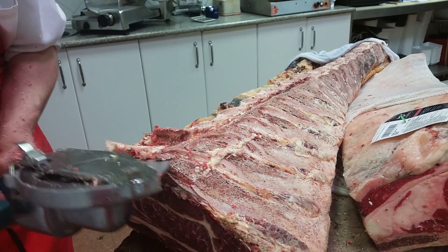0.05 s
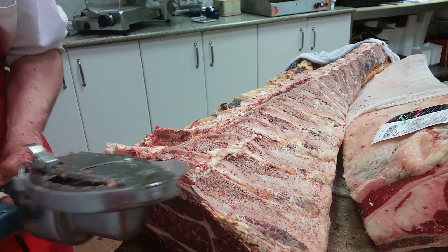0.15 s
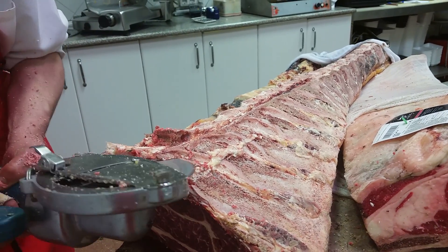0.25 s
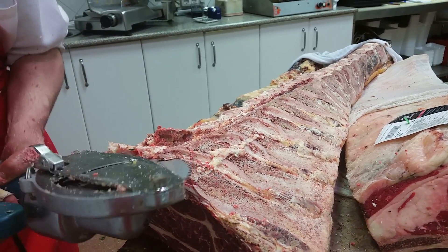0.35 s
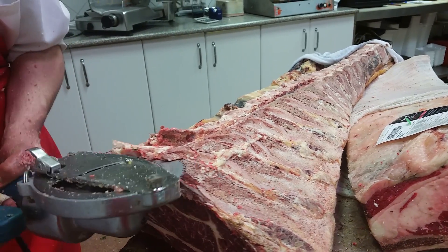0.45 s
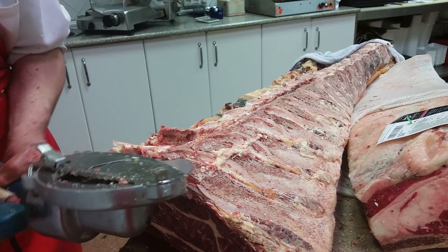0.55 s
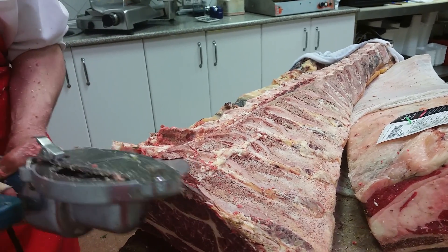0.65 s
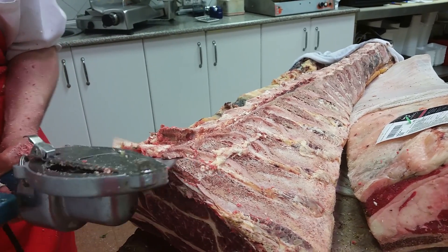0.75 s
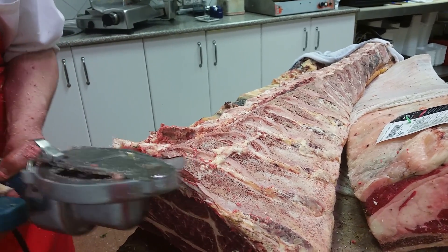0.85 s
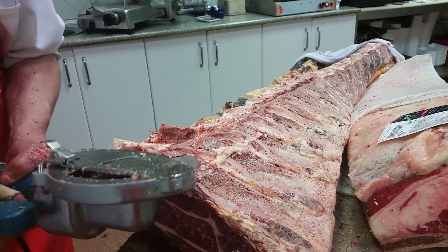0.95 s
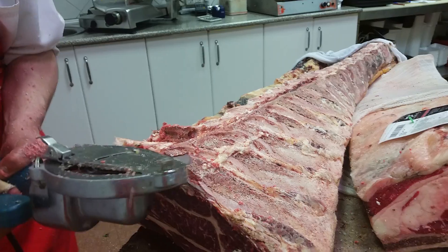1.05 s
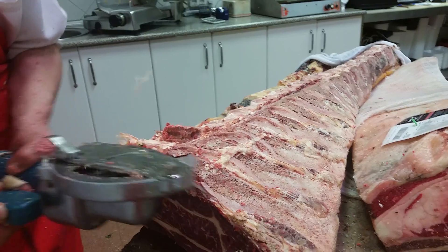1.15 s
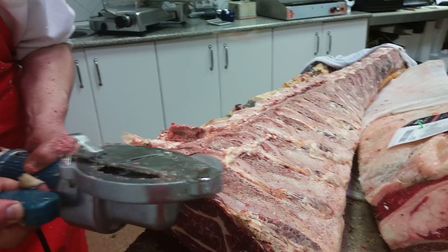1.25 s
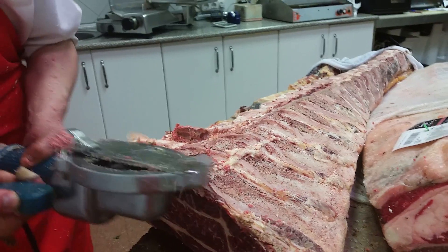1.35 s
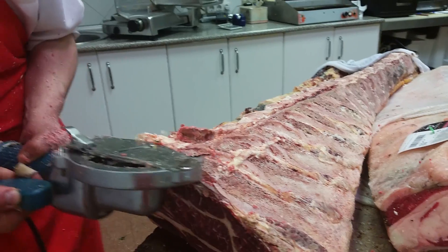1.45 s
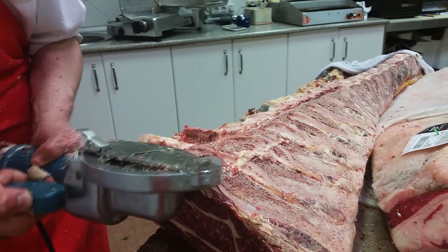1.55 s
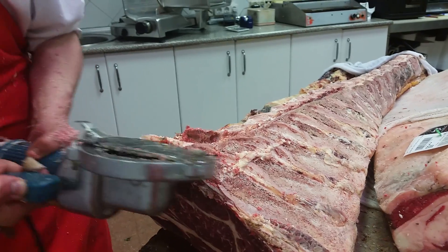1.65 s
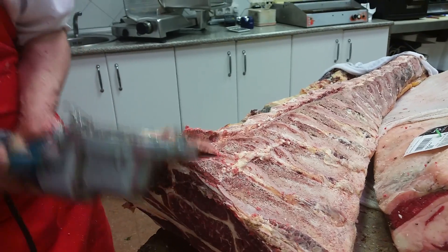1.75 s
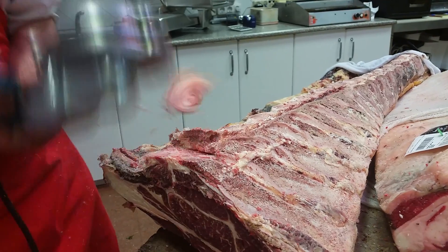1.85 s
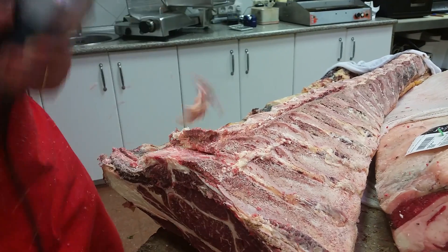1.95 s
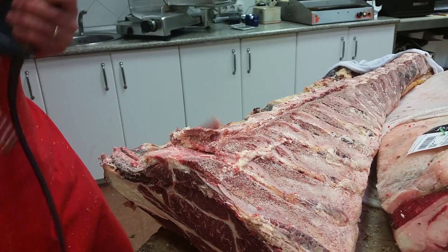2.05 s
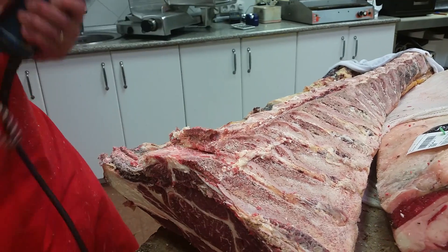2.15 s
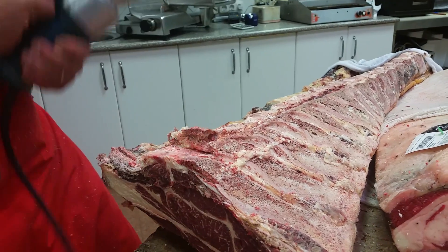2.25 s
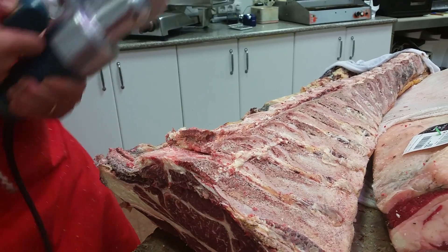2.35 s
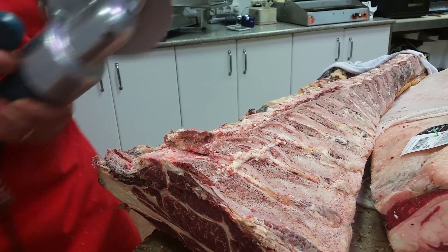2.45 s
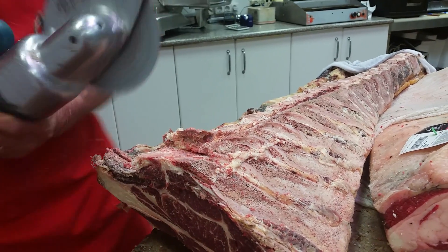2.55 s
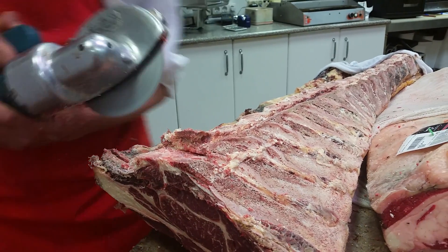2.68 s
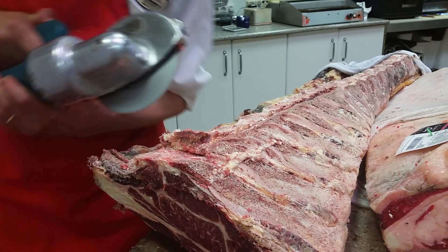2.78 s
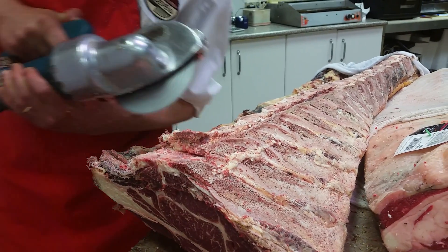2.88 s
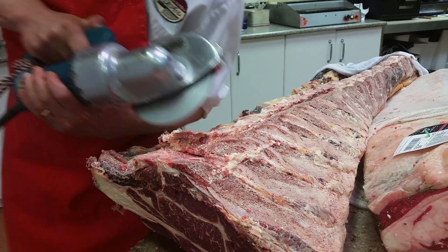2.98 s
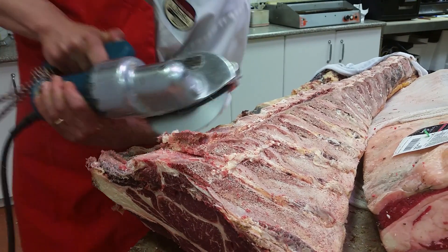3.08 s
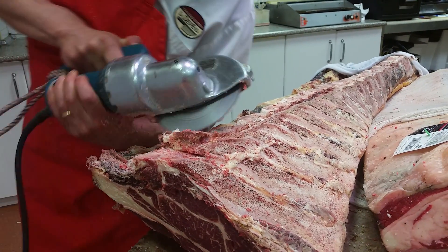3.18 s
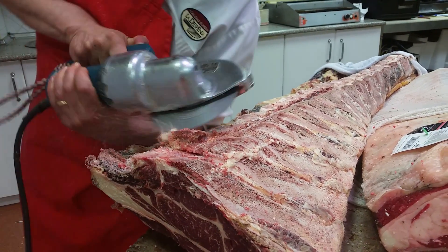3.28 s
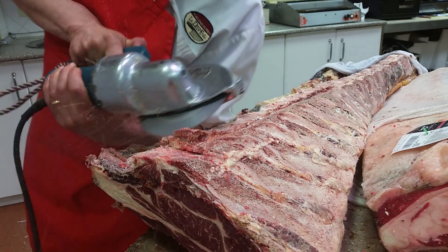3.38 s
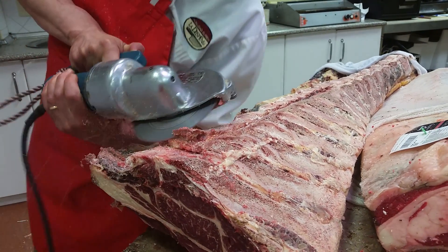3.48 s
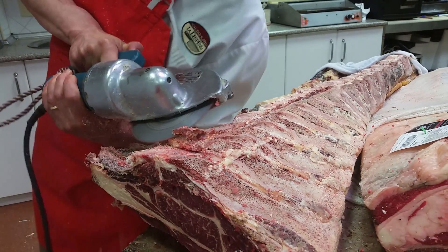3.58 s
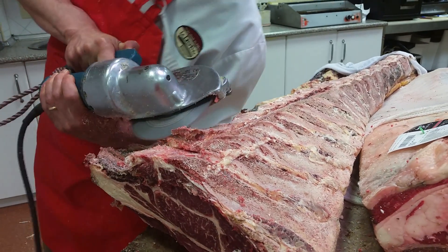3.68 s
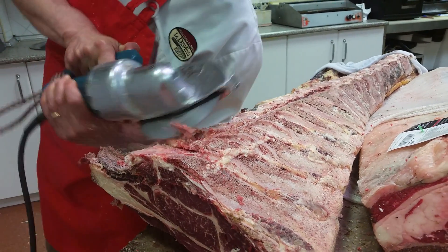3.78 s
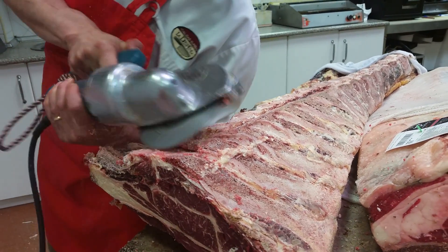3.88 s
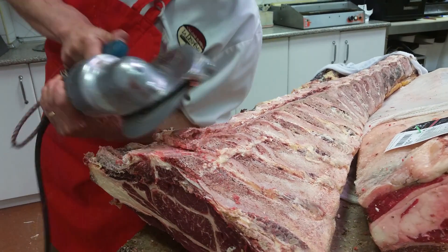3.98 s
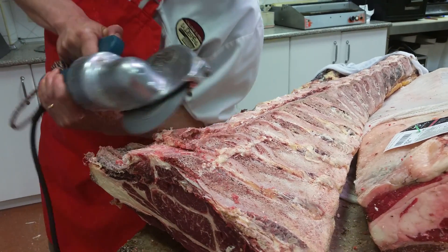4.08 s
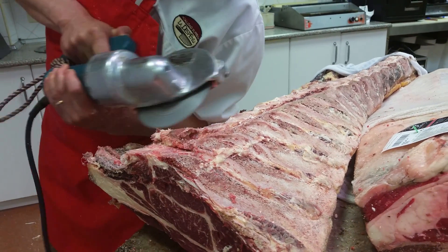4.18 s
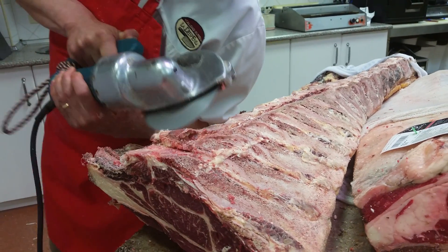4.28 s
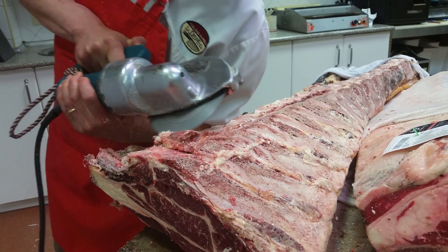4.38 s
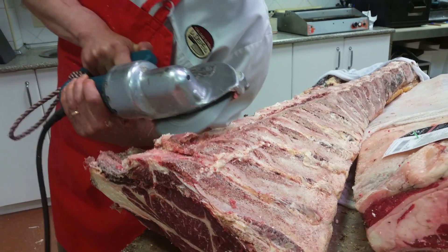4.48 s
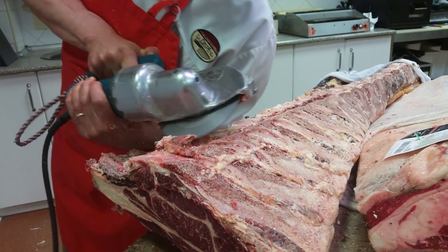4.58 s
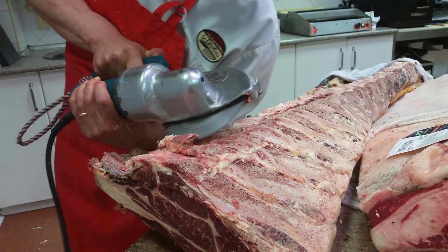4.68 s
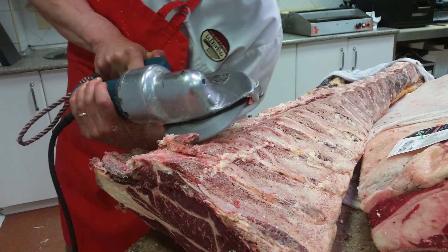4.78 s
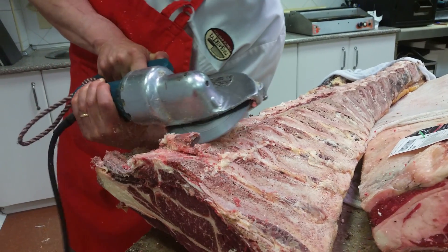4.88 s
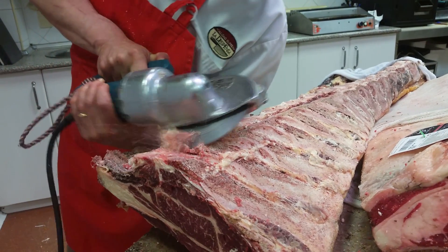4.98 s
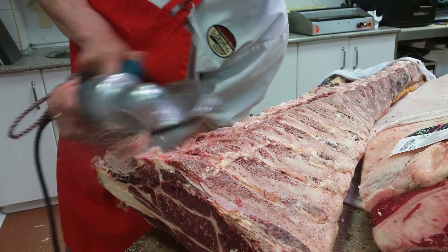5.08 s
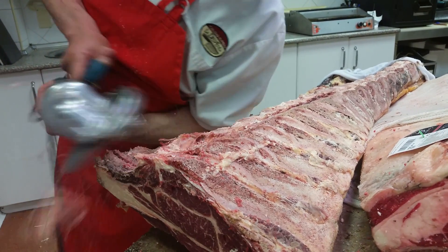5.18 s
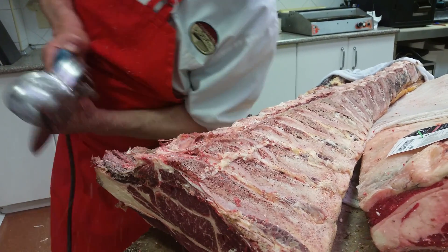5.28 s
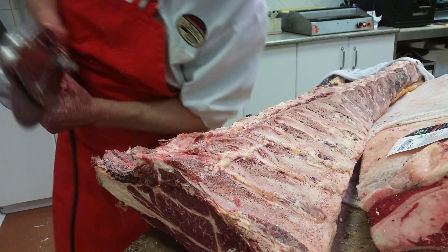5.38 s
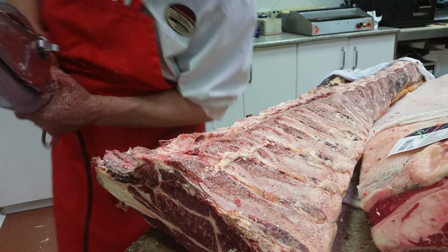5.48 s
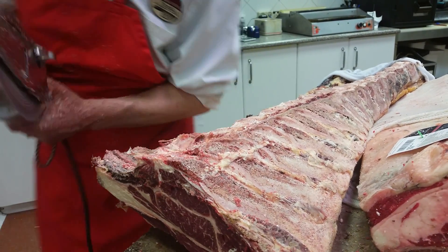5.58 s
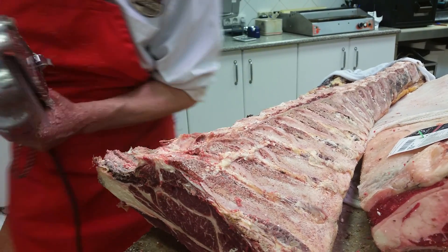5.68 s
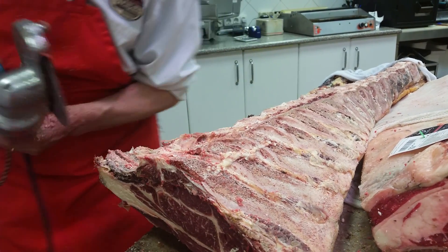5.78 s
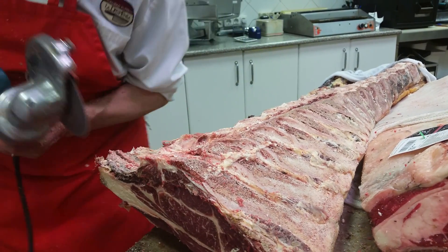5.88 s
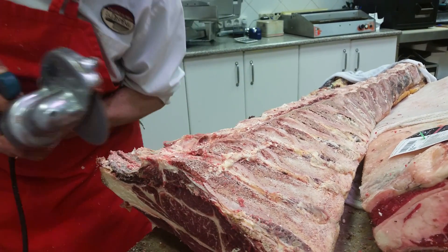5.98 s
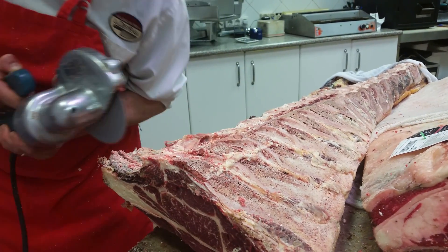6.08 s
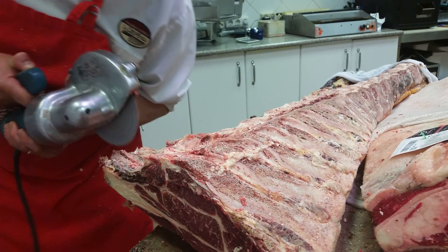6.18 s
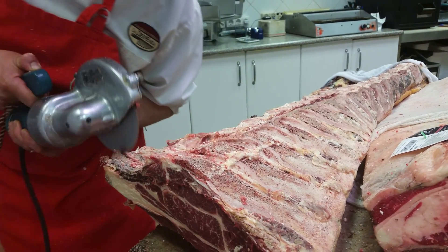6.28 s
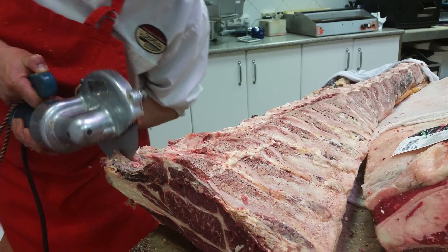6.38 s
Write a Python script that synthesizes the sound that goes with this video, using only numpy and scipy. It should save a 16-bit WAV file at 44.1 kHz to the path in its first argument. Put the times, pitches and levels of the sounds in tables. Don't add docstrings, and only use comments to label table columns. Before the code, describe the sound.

A handheld electric saw grinds harshly through bone, coasts down, whines back up, bites again with a ringing screech, then slows and revs once more.

```python
import sys
import numpy as np
from scipy import signal
from scipy.fft import rfft, irfft, next_fast_len
from scipy.io import wavfile
from scipy.ndimage import uniform_filter1d, map_coordinates

SR = 44100
rng = np.random.default_rng(int(sys.argv[2]) if len(sys.argv) > 2 else 0)


def wrap_up_sound(samples):
    columns = np.atleast_2d(samples).T
    tamed = np.clip(columns, -1, 1)
    steps = np.round(tamed * 32767).astype(np.int16)
    wavfile.write(sys.argv[1], SR, steps)


def how_loud(loudness_db):
    steps = np.asarray(loudness_db, float) / 20
    return 10 ** steps


N = 283563
FFT_LEN = next_fast_len(N, True)
HZ = np.fft.rfftfreq(FFT_LEN, 1 / SR)
T_S = np.arange(N) / SR

# freq_hz, level_db_per_hz
SHOP_TONE = [(15, -29), (25, -5), (64, -1.5), (267, -0.5), (340, -1), (389, -1), (666, -17), (871, -15),
             (2420, -2), (3930, -34), (6210, -21), (15500, -50)]
# freq_hz, level_db
HUMS = [(100.0, -59), (331.0, -64.5), (662.0, -59.5), (1325.0, -60)]
# freq_hz, level_db_per_hz
GEAR_TONE = [(180, -38), (300, -29), (429, -19), (476, -18.5), (650, -14.5), (1020, -15.5), (1160, -9),
             (1710, -6.5), (2480, 3.5), (3440, -13), (4700, -1.5), (6240, 2), (7570, -4.5), (8780, 2),
             (10500, -27), (13600, -48), (22000, -120)]
# freq_hz, level_db_per_hz
AIR_TONE = [(5290, -63), (9000, -1), (9810, -3.5), (13900, -9), (15900, -17.5)]
# freq_hz, left_minus_right_db
MOTOR_SIDES = [(60, -1.0), (110, -1.0), (200, -3), (380, 1), (700, 3), (1290, 0), (2380, -2), (4400, -13.5),
               (8120, -6.5), (15000, -1)]
# from_s, start_hz, goal_hz, time_constant_s
SPEED = [
    (0, 6175, 6175, 1),
    (1.96, 6175, 800, .95),
    (2.49, 3906, 7576, .323),
    (3.17, 7125, 6900, .2),
    (4.0, 7006, 7878, .523),
    (4.41, 7480, 6900, .2),
    (5.2, 6278, 1900, .952),
    (5.57, 4885, 7617, .356),
    (6.34, 7300, 7000, .2),
]
# whine_db, octave_db, air_db, armature_orders_db, gear_orders_db
STATES = [
    (-55, -64, -12, -3, -5),
    (-49, -56, -11, 2.2, -2),
    (-26, -39, -8.5, 3.5, -5),
    (-29.5, -49, -1.5, -6, -12),
    (-30.5, -36, -9.5, 4, 0),
    (-38, -47, -3, -6, -8),
    (-31, -41, -8, -4, -4),
    (-27.5, -41, -8, 2.5, 4.5),
    (-24, -42, -8, 1.5, -7),
]
SPEED_SLOPES = [14, 8, 12, 6, 22]
# time_s, gear_noise_db, left_minus_right_db
HELD = [(1.96, -27, -5), (2.05, -26, -4.5), (2.15, -26.5, -2.5), (2.47, -26, -0.5), (2.5, -23.5, -2),
        (2.609, -23, -4.5), (3.12, -21, -3.5), (3.17, -24, -3.5), (3.975, -27.5, -8), (4.04, -21, -1.5),
        (4.39, -21.5, -2), (4.42, -27.5, -2), (5.22, -22, -2.2), (5.3, -23, -2.5), (5.38, -22, 0.2),
        (5.58, -22.5, -4.5), (6.02, -22.5, -3.5), (6.32, -21.5, 0)]
# shaft_order, level_db
ARMATURE_ORDERS = [(2, -30), (3, -32.5), (4, -28.5)]
# shaft_order, level_db
GEAR_ORDERS = [(5, -44), (6, -25.5), (7, -25), (8, -23)]
# time_s, level_db, pitch_hz, t60_s
GUARD_KNOCKS = [
    (0.637, -27.5, 627, 0.17),
    (0.709, -20, 645, 0.069),
]
# time_s, level_db, pitch_hz, t60_s
FREED_BLADE = [
    (1.97, -45.5, 828, 2.7),
]
# start_s, length_s, level_db, left_minus_right_db
POPS = [(0, 0.17, -29.5, -1.5), (0.184, 0.054, -30, -5), (0.722, .12, -30.5, 2.5), (0.864, 0.14, -29.5, -6),
        (1.008, 0.022, -28, 9), (1.082, 0.09, -27.5, -4), (1.16, 0.054, -25, -3), (1.282, .16, -40.5, -7),
        (1.454, 0.039, -26.5, -7.5), (1.504, 0.18, -31, -0.5), (1.628, .02, -25.5, -1),
        (1.713, .045, -33.5, -8), (1.746, 0.01, -29, -10), (1.881, 0.016, -32.5, -8),
        (3.179, .006, -37, -9), (3.239, 0.0073, -30, -3), (3.29, 0.13, -45, -4), (3.443, 0.014, -29, -10),
        (3.475, 0.057, -31, -2), (3.852, 0.014, -27, -1), (4.424, 0.071, -30, 1.5), (4.52, 0.066, -24.5, 0),
        (4.748, 0.071, -30, -2), (4.837, 0.055, -29.5, -5), (4.927, 0.11, -35, 1), (5.025, .02, -28, -4),
        (5.055, 0.041, -25.5, -2), (5.18, .006, -50, -6), (6.356, .01, -51, -6)]
# from_s, high_teeth_bite_s, turns_per_s, slowing_per_s2
SPIN = [
    (0, .83, 24.6, 0),
    (2.5, 3.68, 37.2, 0),
    (4.3, 4.435, 37.5, 14),
    (5.15, 5.186, 37.2, 0),
]
# start_s, length_s, hiss_start_db, hiss_end_db, body_re_hiss_db
FIRST_BITES = [(0, 0.1, -21, -18, 4), (.106, 0.29, -18, -27.5, 3.5), (.354, 0.17, -31, -59.5, 7.5),
               (.462, 0.14, -56, -72, 17.5), (.636, 0.068, -33.5, -26, 13.5),
               (.71, 0.37, -20.5, -20.5, 5.5), (1.104, .1, -17, -19, 3), (1.208, 0.08, -19, -21, 3),
               (1.29, 0.14, -19.5, -20, 4.5), (1.45, 0.16, -17.5, -20, 3.5),
               (1.626, 0.068, -19.5, -20.5, 5), (1.69, 0.081, -19, -27, 4.5), (1.76, 0.14, -24, -30, 8.5),
               (1.862, 0.045, -18, -19.5, 3)]
# start_s, length_s, hiss_start_db, hiss_end_db, body_re_hiss_db
LATER_BITES = [(3.186, 0.02, -15, -36.5, 4), (3.242, 0.04, -17.5, -28, 1), (3.302, .148, -20, -19.5, 0.8),
               (3.452, 0.026, -11.5, -10, -5), (3.48, 0.044, -15.5, -9.5, -4),
               (3.55, 0.066, -14, -13.5, -8.5), (3.638, 0.2, -22, -23, -2), (3.848, .052, -16, -18.5, 0.5),
               (3.9, 0.063, -13.5, -39, -1.5), (3.981, 0.0081, -15, -23, 0.5),
               (5.18, 0.02, -18.5, -24, 4.5), (6.358, .03, -19.5, -29, 2)]
# start_s, length_s, hiss_start_db, hiss_end_db, body_re_hiss_db
DEEP_BITES = [
    (4.416, 0.25, -16.5, -18.5, 0.7),
    (4.686, 0.007, -17.5, -20, 0.3),
    (4.71, 0.4, -18, -15.5, 0.73),
]
# freq_hz, level_db_per_hz
FIRST_TONE = [(180, -42), (300, -20.5), (1270, -6.5), (2350, 0.5), (2640, -1), (4070, -12), (6170, -31),
              (8050, 4.5), (10200, -6), (11400, -3), (15900, -5.5)]
# freq_hz, level_db_per_hz
LATER_TONE = [(180, -74), (300, -10.5), (1450, -5), (2280, -4.5), (4000, -7), (6070, -32), (9340, 4.5),
              (10300, -31), (11000, 4), (13200, 5), (15900, 6.5)]
# freq_hz, width_hz, level_db
FIRST_MODES = [(2343, 23, 7), (3770, 41, -10), (4815, 110, -1), (6140, 190, 4.5), (7260, 530, 2),
               (8700, 120, -28), (8700, 10, -24.5), (9560, 73, -7.5), (11350, 120, 1), (13300, 360, -8),
               (14960, 170, -3)]
# freq_hz, width_hz, level_db
LATER_MODES = [(2357, 89, -1), (2910, 110, -5), (3580, 60, -10), (4585, 19, 1), (4720, 57, -5),
               (5896, 3.9, 13.5), (6280, 35, 8.5), (6840, 53, 1.5), (7350, 25, 3.5), (7800, 200, 1.5),
               (9100, 40, -10), (9650, 150, -3.5), (9300, 140, -7.5), (10970, 44, 10), (12400, 220, 0),
               (12990, 80, 7.5), (13200, 110, -20), (14900, 100, -5)]
# freq_hz, left_minus_right_db
FIRST_SIDES = [(60, -12), (110, -16), (200, -3), (380, -3.0), (700, -4), (1290, -4.5), (2380, -5),
               (4400, -15.5), (8120, -2), (15000, -2.5)]
# freq_hz, left_minus_right_db
LATER_SIDES = [(60, -1), (110, -12), (200, -1.5), (380, -1), (700, -1), (1290, -4), (2380, -7),
               (4400, -12.5), (8120, 0.5), (15000, -5.5)]

FIRST_EDGES_DB_PER_S, LATER_EDGES_DB_PER_S = (1080, 235), (1400, 520)
SPLIT_HZ = 9550
LEAD_SAMPLES = 5.89


def evened(x):
    return x / np.sqrt(np.mean(x ** 2) + 1e-20)


def read(points):
    hz, value = np.transpose(points)
    return np.interp(np.log(HZ + 1), np.log(hz + 1), value)


def row_at(table):
    index = np.searchsorted([row[0] for row in table], T_S, "right") - 1
    return np.array(table)[index].T, index


def drift(rate_hz, shape=()):
    step = 1 if rate_hz > 70 else 32
    count = next_fast_len(N // step + 2, True)
    hz = np.fft.rfftfreq(count, step / SR)
    smooth = rfft(rng.standard_normal(shape + (count,))) / np.sqrt(1 + (hz / rate_hz) ** 4)
    fine = np.repeat(irfft(smooth, count), step, axis=-1)
    return evened(uniform_filter1d(fine, size=step)[..., :N])


def panned(pan_db):
    return how_loud(np.outer([.5, -.5], pan_db))


def coloured(drive, gain, sides, alike, lead_samples=0):
    left, other = rfft(drive, FFT_LEN)
    late = left * np.exp(-2j * np.pi * HZ * lead_samples / SR)
    right = alike * late + np.sqrt(1 - alike ** 2) * other
    return np.array([left, right]) * gain * panned(read(sides))


def band(pair, upper):
    high = 1 / (1 + (SPLIT_HZ / (HZ + 1)) ** 24)
    x = irfft(pair * np.sqrt(high if upper else 1 - high), FFT_LEN)[:, :N]
    return x / x.mean(0).std()


def patchy(x, depth_db, bins, frames):
    z = signal.stft(x, nperseg=512, noverlap=384)[2]
    field = rng.standard_normal(z.shape[1:])
    for _ in range(2):
        field = uniform_filter1d(field, bins, 0)
        field = uniform_filter1d(field, frames, 1)
    z = z * how_loud(depth_db * evened(field))
    return signal.istft(z, nperseg=512, noverlap=384)[1][:, :N]


def bursts(start_s, length_s, from_db, to_db, rise_db_per_s, fall_db_per_s):
    depth_db, step = 90, 16
    rise_s, fall_s = depth_db / rise_db_per_s, depth_db / fall_db_per_s
    rows = []
    for a, b, p, q in zip(start_s, start_s + abs(length_s), from_db, to_db):
        times = [a - rise_s, a, b, b + fall_s]
        rows.append(np.interp(T_S[::step], times, [p - depth_db, p, q, q - depth_db]))
    db = np.array(rows)
    level_db = uniform_filter1d(np.repeat(db.max(0), step)[:N], size=100)
    return level_db, np.repeat(db.argmax(0), step)[:N]


def runout():
    (_, bite_s, turns_per_s, slowing), _ = row_at(SPIN)
    since_s = T_S - bite_s
    turns = (turns_per_s - .5 * slowing * since_s) * since_s
    return np.cos(2 * np.pi * turns + .3 * drift(3))


def shop():
    drive = rng.standard_normal((2, N))
    pair = coloured(drive, how_loud(read(SHOP_TONE)), [(50, 0.0), (2000, 0.0)], alike=0.77)
    rumble = irfft(pair, FFT_LEN)[:, :N]
    hum = 0
    for hz, db in HUMS:
        hum = hum + how_loud(db + 3.2 * drift(3.9)) * np.sqrt(2) * np.sin(2 * np.pi * hz * T_S)
    return how_loud(-49.5) * evened(rumble) + hum


def motor():
    at_s, *held = np.transpose(HELD)
    gear_db, pan_db = (np.interp(T_S, at_s, column) for column in held)
    off_db = -60 * (T_S < at_s[0] - .03)
    rattle = rng.standard_normal((2, N)) * how_loud(2.0 * drift(900) + 1.0 * drift(26))
    gear = band(coloured(rattle, how_loud(read(GEAR_TONE)), MOTOR_SIDES, 0.33, LEAD_SAMPLES), False)
    air = band(coloured(rattle[::-1], how_loud(read(AIR_TONE)), MOTOR_SIDES, 0.24, LEAD_SAMPLES), True)

    (since_s, start_hz, goal_hz, lag_s), state = row_at(SPEED)
    hz = goal_hz + (start_hz - goal_hz) * np.exp(-(T_S - since_s) / lag_s)
    full_hz = 7300
    levels_db = np.array(STATES)[state].T + np.outer(SPEED_SLOPES, np.log2(hz / full_hz))
    whine_db, octave_db, air_db, armature_db, gears_db = uniform_filter1d(levels_db, size=1500)

    cycles = np.cumsum(hz * (1 + 0.0019 * drift(44))) / SR
    fuzz_db, fuzz_hz = -4, 260
    whine = how_loud(whine_db + 3 * drift(15, (2,))) * np.sin(2 * np.pi * cycles)
    whine += how_loud(whine_db + fuzz_db) * drift(fuzz_hz, (2,)) * np.cos(2 * np.pi * cycles)
    whine += how_loud(octave_db + 3 * drift(15, (2,))) * np.sin(4 * np.pi * cycles)

    shaft_turns = cycles / 32
    orders = [(k, db + armature_db) for k, db in ARMATURE_ORDERS]
    orders += [(k, db + gears_db) for k, db in GEAR_ORDERS]
    shaft = 0
    for k, db in orders:
        tone = np.sin(2 * np.pi * (round(k) * shaft_turns + rng.random()))
        shaft = shaft + how_loud(db + 2.7 * drift(6.5)) * tone

    noise = patchy(panned(pan_db) * gear + how_loud(air_db) * air, 1.36, bins=3, frames=20)
    return how_loud(off_db) * (how_loud(gear_db) * (noise + shaft) + np.sqrt(2) * whine)


def knocks():
    out, t_s = np.zeros(N), T_S[:20000]
    onset = 1 - np.exp(-t_s / 0.0043)
    for start_s, db, hz, t60_s in GUARD_KNOCKS + FREED_BLADE:
        part = out[round(start_s * SR):][:len(t_s)]
        part += how_loud(db - 60 * t_s / t60_s) * np.sin(2 * np.pi * hz * t_s) * onset
    return out


def pops():
    start_s, length_s, db, pan_db = np.transpose(POPS)
    level_db, which = bursts(start_s, length_s, db, db, 1600, 480)
    pan_db = uniform_filter1d(pan_db[which], size=600)
    chance, height, sign = rng.random((3, 2, N))
    size = how_loud(4.2 * np.minimum(-np.log(height + 1e-9), 3.0))
    size = size * np.where(sign < .75, 1, -1)
    jumps = size * (chance < 420 / SR) * how_loud(4.9 * runout())
    push = 1 / ((1 + 1j * HZ / 220) * (1 + 1j * HZ / 2200))
    swing = (1j * HZ / 55 / (1 + 1j * HZ / 55)) ** 2
    thump = evened(irfft(rfft(jumps, FFT_LEN) * push * swing, FFT_LEN)[:, :N])

    low_hz, top_hz, rasp_db = 350, 1520, -7
    grit = rng.standard_normal((2, N)) * how_loud(5.3 * runout() + 5.8 * drift(130))
    colour = 1j * HZ / low_hz / (1 + 1j * HZ / low_hz) / (1 + 1j * HZ / top_hz) ** 2
    rasp = evened(irfft(rfft(grit, FFT_LEN) * colour, FFT_LEN)[:, :N])
    return np.sqrt(2) * (thump + how_loud(rasp_db) * rasp) * how_loud(level_db) * panned(pan_db)


def cut(bites, edges_db_per_s, tone, modes, sides, ring_db, damping, bounce_db):
    start_s, length_s, first_db, last_db, body_db = np.transpose(bites)
    rise, fall = edges_db_per_s
    body_share = .55
    hiss_level_db = bursts(start_s, length_s, first_db, last_db, rise, fall)[0]
    slid_db = first_db + body_share * (last_db - first_db)
    body_level_db = bursts(start_s, length_s, first_db + body_db, slid_db + body_db,
                           rise, body_share * fall)[0]

    chips = rng.standard_normal((2, N)) * how_loud(0.66 * drift(1350) + 1.0 * drift(160))
    ring = 0
    for hz, width_hz, db in modes:
        ring = ring + how_loud(db + ring_db) ** 2 / (1 + (2 * (HZ - hz) / (width_hz * damping)) ** 2)
    gain = np.sqrt(how_loud(read(tone)) ** 2 + ring)
    pair = coloured(chips, gain, sides, 0.12, 2 * LEAD_SAMPLES)

    chatter = how_loud(0.23 * drift(12))
    bounce = bounce_db * runout()
    hiss = how_loud(hiss_level_db + bounce) * band(pair, True)
    body = how_loud(body_level_db + .5 * bounce) * band(pair, False)
    return chatter * patchy(hiss + body, 2.4, bins=2, frames=14)


def scene():
    later_blade = (LATER_EDGES_DB_PER_S, LATER_TONE, LATER_MODES, LATER_SIDES)
    first = cut(FIRST_BITES, FIRST_EDGES_DB_PER_S, FIRST_TONE, FIRST_MODES, FIRST_SIDES,
                ring_db=4.0, damping=1.38, bounce_db=0.4)
    later = cut(LATER_BITES, *later_blade, ring_db=9.5, damping=1.27, bounce_db=2.0)
    deep = cut(DEEP_BITES, *later_blade, ring_db=5.0, damping=3.0, bounce_db=1.1)
    bend = np.cumsum(0.00467 * drift(11.1))
    at = np.arange(N) + bend - uniform_filter1d(bend, size=8000)
    blade = [map_coordinates(x, [at], order=3, mode="reflect") for x in first + later + deep]
    return shop() + motor() + knocks() + blade


def roll_off(x):
    return signal.sosfilt(signal.butter(12, 16990, fs=SR, output="sos"), x)


def record(dry):
    x = dry + pops() + how_loud(-73) * rng.standard_normal(dry.shape)
    x = x / (1 + (abs(x) / .86) ** 6) ** (1 / 6)
    edge = signal.firwin(511, 15750, window=("kaiser", 9), fs=SR)
    mix = signal.oaconvolve(x, edge[None], "same")
    return roll_off(mix)


dry = scene()
out = record(dry)
wrap_up_sound(out)
```